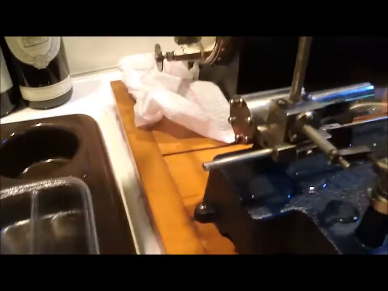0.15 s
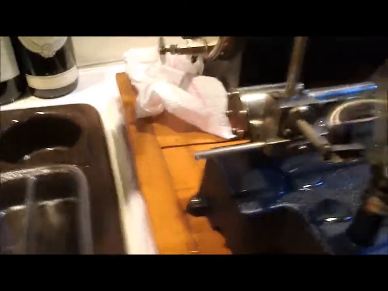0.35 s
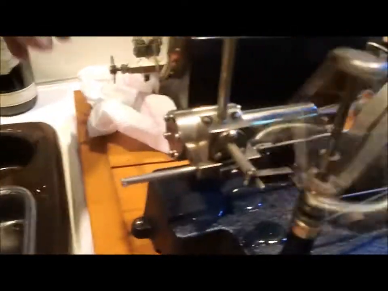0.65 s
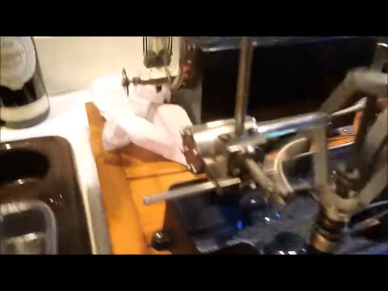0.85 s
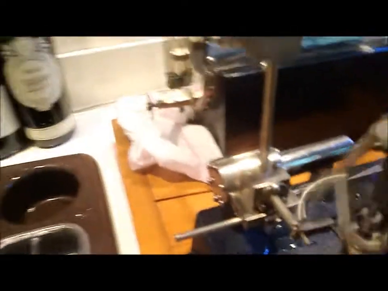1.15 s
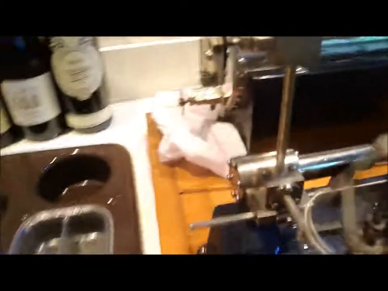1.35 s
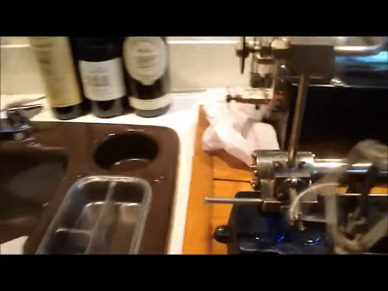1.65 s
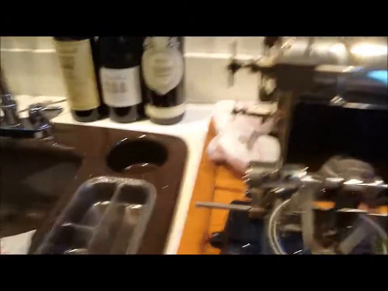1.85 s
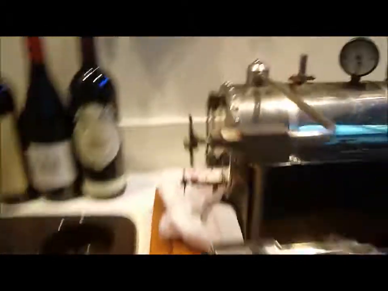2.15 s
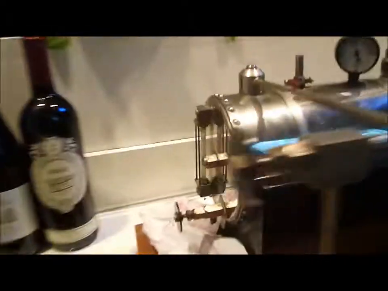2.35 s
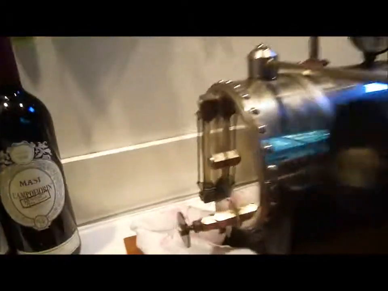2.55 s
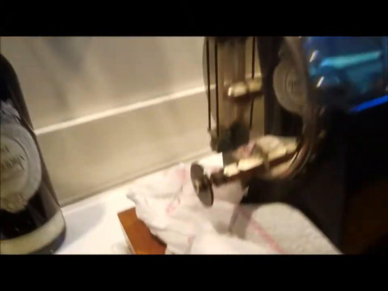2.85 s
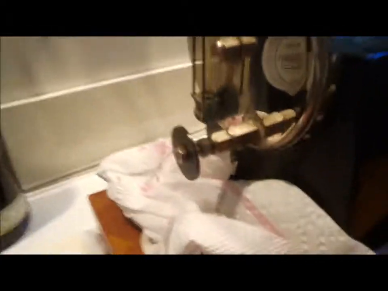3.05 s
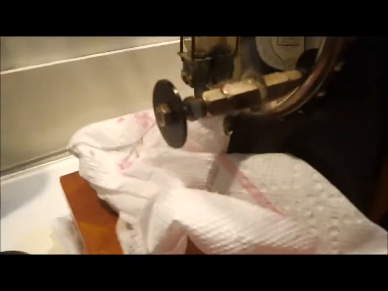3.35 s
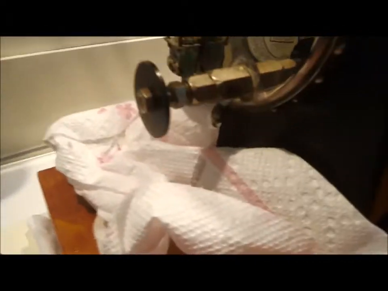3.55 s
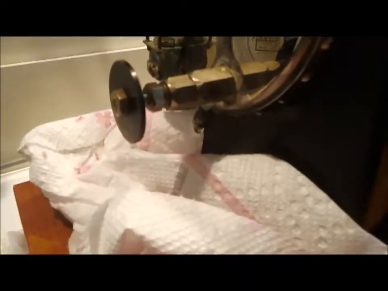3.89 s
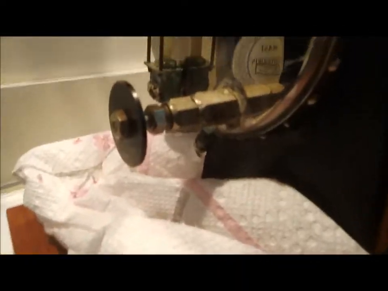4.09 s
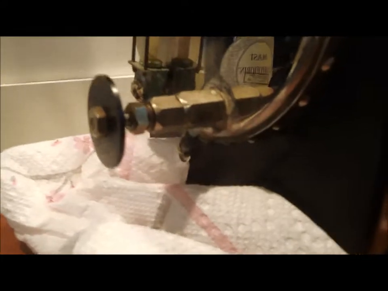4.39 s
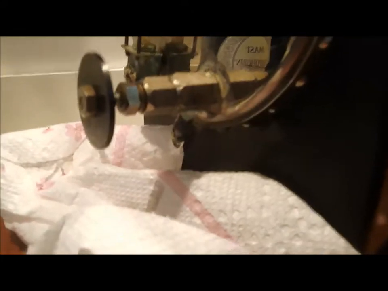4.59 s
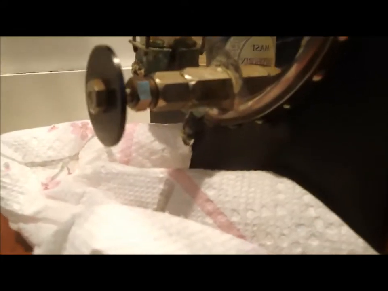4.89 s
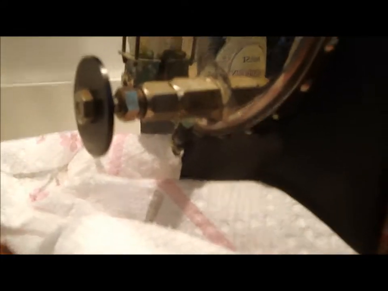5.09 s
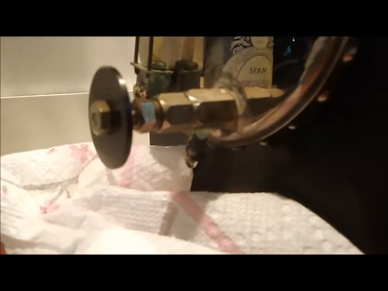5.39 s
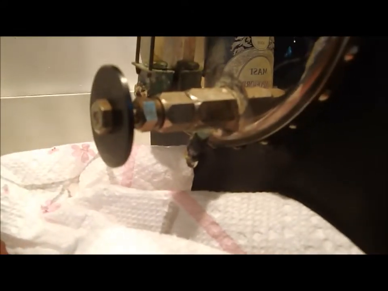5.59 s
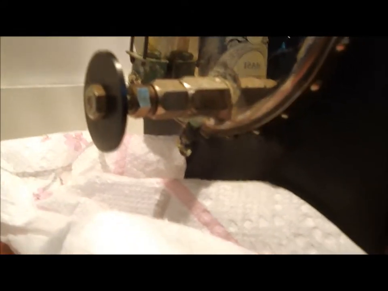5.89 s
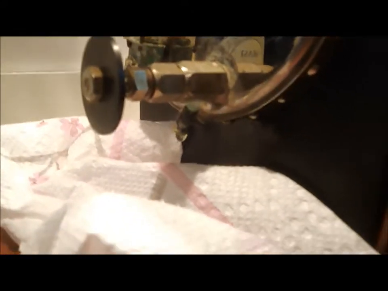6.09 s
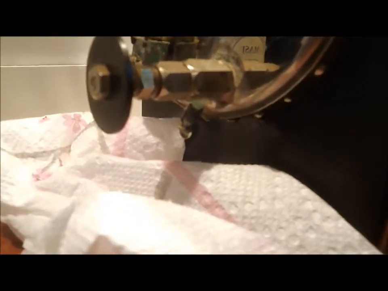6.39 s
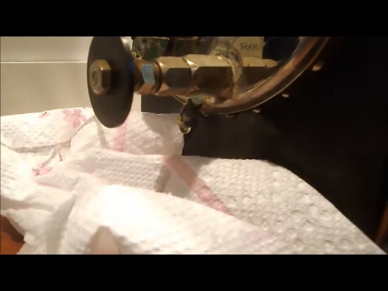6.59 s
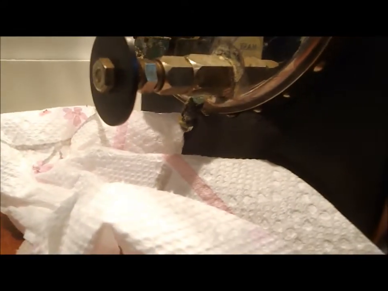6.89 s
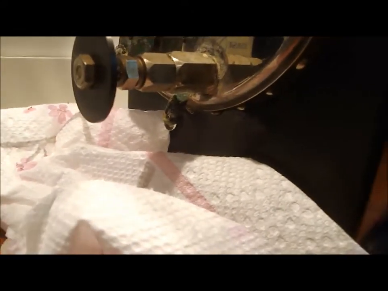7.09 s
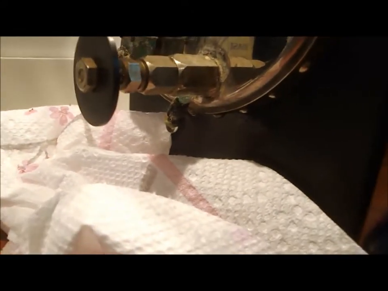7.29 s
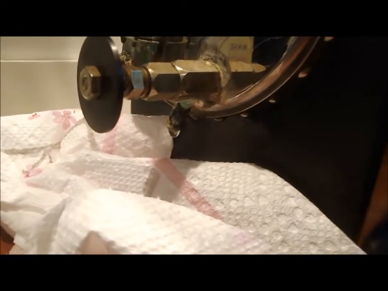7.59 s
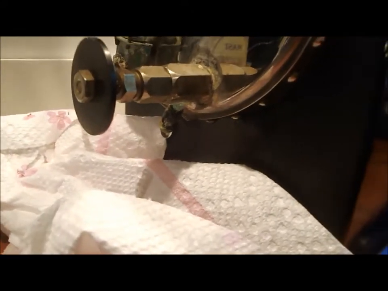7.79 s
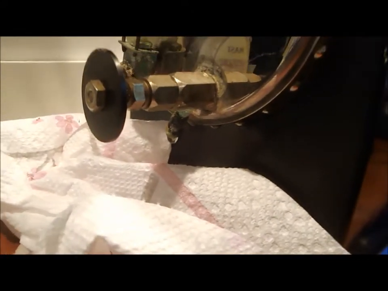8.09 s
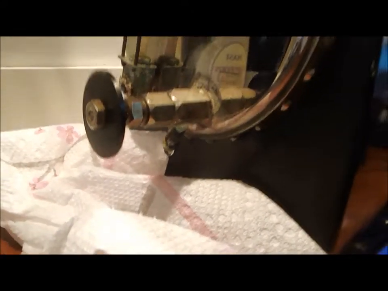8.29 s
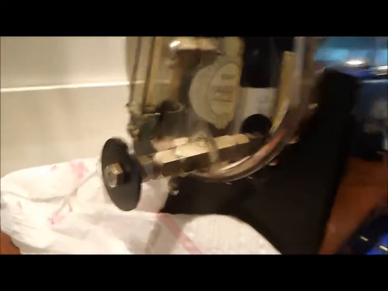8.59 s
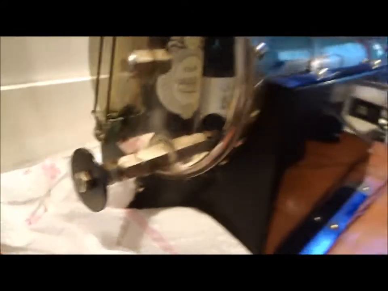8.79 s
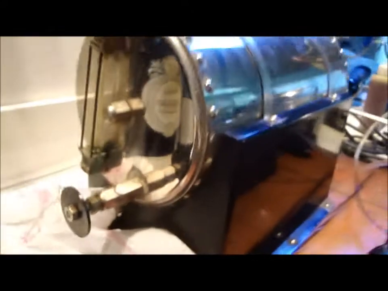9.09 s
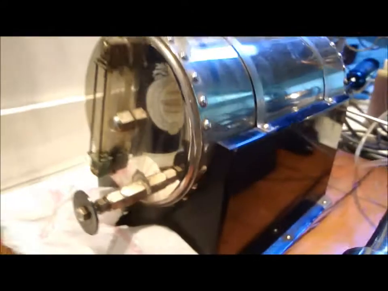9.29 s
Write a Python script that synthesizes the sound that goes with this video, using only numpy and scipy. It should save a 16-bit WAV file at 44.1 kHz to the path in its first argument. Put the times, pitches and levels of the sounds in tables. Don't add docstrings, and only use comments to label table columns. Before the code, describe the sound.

Rapid, even double chuffs of a miniature steam engine over sharp hissing steam and light metallic rattle, heard close in a kitchen with watery spits.

```python
import sys
import numpy as np
from scipy import signal
from scipy.fft import rfft, irfft
from scipy.io import wavfile
from scipy.ndimage import uniform_filter1d

SR = 44100
rng = np.random.default_rng(int(sys.argv[2]) if len(sys.argv) > 2 else 0)


def to_linear_factor(level_db):
    exponent = np.asarray(level_db, float) / 20
    return 10 ** exponent


def store_wav(level_fs):
    pcm = np.round(np.clip(np.atleast_2d(level_fs), -1, 1) * 32767)
    wavfile.write(sys.argv[1], SR, pcm.T.astype(np.int16))


N = 416731
TIME = np.arange(N) / SR


def evened(x):
    return x / np.sqrt(np.mean(x ** 2) + 1e-20)


def read(points, hz):
    f, value = np.transpose(points)
    return np.interp(np.log(hz + 1), np.log(f + 1), value)


def columns(rows, t):
    s, *values = np.transpose(rows)
    return [np.interp(t, s, v) for v in values]


def filtered(x, order, hz, kind):
    return signal.sosfilt(signal.butter(order, hz, kind, fs=SR, output="sos"), x)


def wander(ms):
    size = max(int(ms * SR / 1000), 2)
    smooth = uniform_filter1d(rng.standard_normal(N), size)
    return evened(uniform_filter1d(smooth, size))


def noise(shape, patchy_db):
    hz = np.fft.rfftfreq(1024, 1 / SR)[:, None]
    t = np.arange(N // 256 + 5) * 256 / SR
    re, im, patches = rng.standard_normal((len(t), len(hz), 3)).T
    patches = uniform_filter1d(patches, size=9, axis=0)
    patches = evened(uniform_filter1d(patches, size=5, axis=1))
    gain = shape(hz, t) * to_linear_factor(patchy_db * patches)
    z = (re + 1j * im) * gain / np.sqrt(np.mean(gain ** 2, 0))
    return evened(signal.istft(z, nperseg=1024, noverlap=768)[1][:N])


def ring(hz, t60, t):
    return to_linear_factor(-60 * t / t60) * np.sin(2 * np.pi * hz * t)


# (time [s], nearness [0-1], jet level [dB], facing the port [dB])
CAMERA_PLACE = [(0, 0.1, -26, -6), (.9, 0.03, -28, -6.5), (2.1, 0.3, -27, -7.5), (2.6, 0.39, -23, -4),
                (3.2, 0.49, -25.5, -9), (3.5, 0.75, -25, -4), (4.2, 0.88, -23, -4.5), (5.7, 1, -25, -6.5),
                (7, 0.94, -24, -5.5), (8, 0.97, -25.5, -8.5), (8.75, .88, -26, -10), (9.1, .6, -24.5, -7.5),
                (9.45, 0.41, -22.5, -2)]


def place(t):
    return columns(CAMERA_PLACE, t)


def with_nearness(far_db, rise_db):
    return far_db + rise_db * place(TIME)[0]


# (time [s], wall [ms], boiler [ms], counter [ms])
ECHO_PATHS = [(0, 2.44, 1.135, .655), (.6, 2.45, 1.14, .73), (1.5, 2.385, 1.142, .72),
              (1.8, 2.4, 1.152, .876), (2.5, 2.29, 1.14, .885), (3, 2.13, 1.15, .795),
              (3.4, 2.06, 1.2, .915), (3.7, 2, 1.328, .93), (4.1, 1.85, 1.324, .89),
              (4.5, 1.684, 1.308, .882), (6.2, 1.654, 1.288, .866), (8.35, 1.647, 1.285, .858),
              (8.6, 1.87, 1.058, 1.055), (8.95, 2.016, 1.096, 1.088), (9.15, 2.024, 1.116, .892),
              (9.45, 2.06, 1.08, .892)]
ECHO_SHARES = (.24, .17, .17)


def comb(hz, t):
    mirror = 1.5 * np.clip((hz - 1000) / 4000, 0, 1)
    paths = zip(columns(ECHO_PATHS, t), ECHO_SHARES)
    echoes = sum(share * np.exp(-2j * np.pi * hz * ms / 1000) for ms, share in paths)
    return abs(1 + mirror * echoes)


# (time [s], lag [ms])
CRANK_LAG = [(0, 0.6), (1, -1.3), (2.5, -3), (3.7, -1.5), (5.3, 0.47), (6.5, 0.52), (9.45, 1.1)]


def openings():
    first_s, turn_s, in_stroke_s, play_ms = .0206, .112845, .0589, .5
    stroke = np.arange(-1, 2 * int(N / SR / turn_s) + 3)
    even = first_s + stroke // 2 * turn_s + stroke % 2 * in_stroke_s
    late_ms = columns(CRANK_LAG, even)[0] + play_ms * rng.standard_normal(len(even))
    return even + late_ms / 1000


# (time after opening [ms], out-stroke [dB], in-stroke [dB])
BLAST_CURVE = [(-6.5, -35, -30), (-4, 1, -9.5), (1.5, 8, 3.5), (13, 7.5, 3.5), (16, 3, -1), (44, -20, -14),
               (39, -45, -12), (47, -16, -58)]
# (time before next opening [ms], level [dB])
SIGH_CURVE = [(0, -42), (5, -17.5), (9, -14), (13, 5), (18, 3.5), (26, -0.5), (40, -3), (70, -5)]
# (blast [dB], sigh [dB])
STROKE_LEVELS = [
    (0.1, -4.5),
    (4.5, -3),
]
# (time [s], extra blast [dB])
CHUFF_ACCENTS = [(.471, 2), (.868, 1.5), (1.093, -2), (1.823, 1.5), (2.161, -3), (2.445, 2.5), (3.178, 1.5),
                 (3.35, 2), (3.575, -2), (4.192, -3.5), (4.307, 2.5), (4.366, 1.5), (4.931, -1.5),
                 (4.985, 2), (5.383, 2), (6.288, 2), (6.454, 1.5), (6.566, 1.5), (6.792, -2.5), (6.904, 2),
                 (7.414, 1.5), (7.528, -2), (7.921, -2), (8.206, 2.5), (8.432, -2)]


def valve(opens):
    stroke = np.searchsorted(opens - .0025, TIME) - 1
    since_ms = 1000 * (TIME - opens[stroke])
    until_ms = 1000 * (opens[stroke + 1] - TIME)
    out_db, in_db = columns(BLAST_CURVE, since_ms)
    scatter_db = [.7, 1.4]
    uneven = rng.standard_normal((len(opens), 2)) * scatter_db
    at, extra_db = np.transpose(CHUFF_ACCENTS)
    uneven[abs(opens[:, None] - at).argmin(axis=0), 0] = extra_db
    blast_db, sigh_db = (np.array(STROKE_LEVELS)[1 - stroke % 2] + uneven[stroke]).T
    blast = to_linear_factor(blast_db + np.where(stroke % 2, out_db, in_db))
    pop_per_db, pop_ms = .2, 2.0
    wetness = np.maximum(uneven[stroke, 0], 0)
    blast *= 1 + pop_per_db * wetness * np.exp(-((since_ms - 1.5) / pop_ms) ** 2)
    sigh = to_linear_factor(sigh_db + columns(SIGH_CURVE, until_ms)[0]) * np.clip(since_ms / 14, 0, 1)
    return to_linear_factor(place(TIME)[1]) * np.sqrt(blast ** 2 + sigh ** 2)


# (time [s], hiss [Hz], pipe [Hz], pipe level [dB])
JET_RIDGES = [(0, 7640, 4720, -1), (.6, 7600, 4640, 1.5), (1.3, 7630, 4620, -0.8), (2, 7630, 4650, -.6),
              (2.75, 7800, 4700, -3.5), (2.95, 7400, 4460, -1.1), (3.55, 7950, 4550, -1.7),
              (3.75, 7700, 4510, 1.4), (4.6, 7810, 4600, -0.6), (7.7, 7790, 4500, -0.7),
              (8.35, 7730, 4520, 4.5), (8.65, 7850, 4500, -3), (8.85, 7500, 4530, 0),
              (9.4, 7700, 4540, -1.5)]
# (frequency [Hz], level [dB])
HISS_SPECTRUM = [(5000, -25.5), (6500, -18), (7300, -16), (7700, -7), (8050, -5), (8500, -4.5), (9200, -13),
                 (9700, -9), (10200, -0.5), (10800, 2), (11500, 2.5)]
# (frequency [Hz], level [dB])
WHOOSH_SPECTRUM = [(500, -14), (900, -2.5), (1300, 5), (1800, -2.5), (2500, -3.5), (3700, -3.5), (5300, -6),
                   (6400, -3), (9000, -32), (11500, -9)]


def exhaust(opens):
    flow = valve(opens) * to_linear_factor(0.5 * wander(0.98) + 0.62 * wander(6.0))
    pulse = flow / uniform_filter1d(flow, SR // 4)

    def hiss_shape(hz, t):
        slide = 1 + (8000 / columns(JET_RIDGES, t)[0] - 1) * np.clip((9800 - hz) / 1000, 0, 1)
        facing_db = place(t)[2] * np.clip((hz - 9200) / 700, 0, 1)
        return to_linear_factor(read(HISS_SPECTRUM, hz * slide) + facing_db) * comb(hz, t)

    def whoosh_shape(hz, t):
        return to_linear_factor(read(WHOOSH_SPECTRUM, hz)) * comb(hz, t)

    def pipe_shape(hz, t):
        width_hz = 480 - 110 * place(t)[0]
        return comb(hz, t) / (1 + ((hz - columns(JET_RIDGES, t)[1]) / width_hz) ** 2)

    hiss = to_linear_factor(0.5) * flow * noise(hiss_shape, patchy_db=1.5)
    whoosh_db = with_nearness(-45, 11) + 1.44 * wander(29.0)
    whoosh = to_linear_factor(whoosh_db) * pulse ** 0.6 * noise(whoosh_shape, patchy_db=2.0)
    pipe_db = place(TIME)[1] + with_nearness(-14, 3) + columns(JET_RIDGES, TIME)[2]
    pipe = to_linear_factor(pipe_db) * pulse ** 0.68 * noise(pipe_shape, patchy_db=2.5)
    return hiss + whoosh + pipe


# (time [s], peak [dB], pitch [Hz])
WATER_SPITS = [(2.576, -20.5, 1160), (2.807, -20, 1160), (3.4, -19.5, 790), (3.635, -15.5, 775),
               (3.688, -15.5, 773), (3.721, -19, 785), (3.755, -19, 815), (4.165, -14, 760),
               (4.726, -23, 780), (4.891, -15.5, 794), (4.946, -15, 1254), (5.547, -20, 746),
               (5.758, -14.5, 756), (5.975, -18, 780), (6.187, -19, 1276), (6.526, -16, 1290),
               (6.66, -16, 780), (6.73, -15, 785), (7.203, -19, 1290), (7.314, -19, 1250),
               (7.772, -13.5, 794), (7.855, -11.5, 787), (7.875, -11, 773), (7.994, -18, 1210),
               (8.167, -20, 750), (8.418, -16, 800), (8.457, -16.5, 780), (9.002, -18, 775),
               (9.036, -14.5, 746), (9.07, -16.5, 777)]


def spits():
    out, t = np.zeros(N + 2000), np.arange(2000) / SR
    bursts = rng.standard_normal((len(WATER_SPITS), 130))
    for (s, db, hz), burst in zip(WATER_SPITS, bursts):
        at = round(s * SR)
        tone = ring(hz, .035, t)
        rough = signal.oaconvolve(tone + .4 * ring(1.58 * hz, .025, t), burst)[:len(t)] / np.sqrt(130 / 2)
        soft_onset = 1 - np.exp(-t / .0012)
        out[at:at + len(t)] += to_linear_factor(db - 2.5) * (tone * soft_onset + .2 * rough)
    return out[:N]


def blows(turns, ms, scatter_ms):
    late, size = rng.standard_normal((len(turns), 2)).T
    at = ((turns + (ms + scatter_ms * late) / 1000) * SR).astype(int)
    train = np.zeros(N)
    train[at[at < N]] = to_linear_factor(1.8 * size)[at < N]
    return train


# (time after out-stroke blast [ms], base [dB], frame [dB], scatter [ms])
TURN_KNOCKS = [
    (2.444, -22, 9, 0.924),
    (25.54, 17.5, -17.5, 1.31),
    (50.4, 17.5, -10, 0.16),
    (76.9, -17, 2.5, 0.79),
    (87.7, -4, -4.5, 0.94),
    (98, -17, -6, 2.4),
]


def knocks(turns):
    shake, knock = np.zeros(N), np.zeros(N)
    for ms, base_db, frame_db, scatter_ms in TURN_KNOCKS:
        train = blows(turns, ms, scatter_ms)
        shake += to_linear_factor(base_db) * train
        knock += to_linear_factor(frame_db) * train
    return shake, knock


# (time after out-stroke blast [ms], level [dB])
RATTLE_CURVE = [(0, 0), (12, 0), (28, 5.5), (33, -7.5), (60, 2.5), (72, 8), (90, 5), (113, 1)]


def rattle(turns):
    edges = np.r_[turns[0] - .113, turns, turns[-1] + .113]
    angle = np.interp(TIME, edges, np.arange(len(edges))) % 1
    ticks = (rng.random(N) < 900 / SR) * rng.choice([-1., 1.], N)
    ticks = ticks * to_linear_factor(3. * np.minimum(rng.exponential(1, N), 5))
    return to_linear_factor(-18) * ticks * to_linear_factor(columns(RATTLE_CURVE, 113 * angle)[0])


# (frequency [Hz], t60 [s], far level [dB], close level [dB])
FRAME_MODES = [(303.7, 0.075, 1.5, 1.5), (315.5, 0.039, 10.5, -9), (340.3, 0.073, 3.5, -10),
               (365.7, 0.068, -17, -1), (408, 0.095, -6, -1), (465, 0.096, -4.5, -3.5),
               (561, 0.031, 1.5, 4), (735, 0.019, 7.5, 11.5), (775, 0.059, -51, 8.5), (851, 0.055, -8.5, 1),
               (1136, 0.035, 5.5, 2), (1240, 0.051, -10, 2.5), (1568, 0.013, -18, 7),
               (2139, 0.033, -2.5, -3)]
# (time [s], share [0-1])
BEHIND_BOILER = [(3.27, 0), (3.35, 1), (9.1, 1), (9.25, .2)]


def frame(turns, knock, loose):
    close = np.clip(columns(BEHIND_BOILER, TIME)[0], 0, 1)
    t = np.arange(6000) / SR
    out = np.zeros(N)
    for k, (hz, t60, far_db, near_db) in enumerate(FRAME_MODES):
        struck = signal.oaconvolve(knock, ring(hz, .45 * t60, t))
        rattled = signal.oaconvolve(loose, ring(hz, t60, t))
        out += (-1) ** k * to_linear_factor(far_db + close * (near_db - far_db)) * (struck + rattled)[:N]
    slap = (ring(720, .022, t) - .7 * ring(480, .025, t)) * (1 - np.exp(-t / .001))
    out += to_linear_factor(17.) * signal.oaconvolve(blows(turns, 1.55, 0.39), slap)[:N]
    out = filtered(out, 6, 265, "high")
    return out / np.sqrt(uniform_filter1d(out ** 2, SR // 2))


# (frequency [Hz], t60 [s], level [dB])
BASE_MODES = [(98, .3, -13), (124, .3, -7.5), (141.8, .35, -4), (212.6, .25, -1)]


def base(shake):
    t = np.arange(6000) / SR
    modes = sum((-1) ** k * to_linear_factor(db) * ring(hz, t60, t) for k, (hz, t60, db) in enumerate(BASE_MODES))
    return evened(filtered(signal.oaconvolve(shake, modes)[:N], 4, [92, 240], "band"))


def clatter(turns):
    shake, knock = knocks(turns)
    metal = frame(turns, knock, rattle(turns))
    return to_linear_factor(with_nearness(-45, 12)) * (to_linear_factor(-1.5) * metal + to_linear_factor(-20) * base(shake))


def snap():
    at_s, peak_db, width_s = 4.2213, -9.5, .00005
    u = (TIME - at_s) / width_s
    fizz = 0.55 * rng.standard_normal(N) * (u > 0) * np.exp(-abs(u) / 16)
    return to_linear_factor(peak_db) * (fizz - 1.3 * u * np.exp(-u ** 2 / 2))


# (frequency [Hz], t60 [s])
KITCHEN_DECAY = [(200, 0.72), (1000, 0.099), (4000, 1), (11000, 0.48)]


def kitchen(x):
    burst = np.r_[np.zeros(250), rng.standard_normal(SR // 2)]
    hz, t, z = signal.stft(burst, SR, nperseg=256)
    decay = to_linear_factor(-60 * t / read(KITCHEN_DECAY, hz)[:, None])
    tail = signal.istft(z * decay, SR, nperseg=256)[1]
    return signal.fftconvolve(x, tail / np.linalg.norm(tail))[:N]


# (frequency [Hz], level [dB])
FLOOR_SPECTRUM = [(25, 8), (60, -7), (130, -4), (220, -4), (500, -25), (11000, -45)]


def house_floor():
    return to_linear_factor(with_nearness(-64, 7.1)) * noise(lambda hz, t: to_linear_factor(read(FLOOR_SPECTRUM, hz)), 0)


def scene():
    opens = openings()
    steam = filtered(exhaust(opens) + spits(), 4, 300, "high")
    engine = steam + clatter(opens[1::2]) + snap()
    return (engine + to_linear_factor(-11.5) * kitchen(engine) + house_floor())[None]


def roll_off(x):
    return signal.sosfilt(signal.butter(12, 12380, fs=SR, output="sos"), x)


def record(dry):
    x = filtered(dry, 2, 110, "high")
    hz = np.fft.rfftfreq(N, 1 / SR)
    skirt_db = np.interp(hz, [10960, 11020, 11800], [0, -33, -74])
    mix = irfft(rfft(x) * to_linear_factor(skirt_db), N)
    return roll_off(mix)


dry = scene()
out = record(dry)
store_wav(out)
```